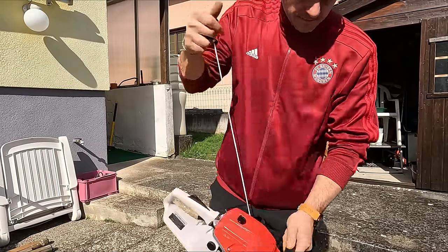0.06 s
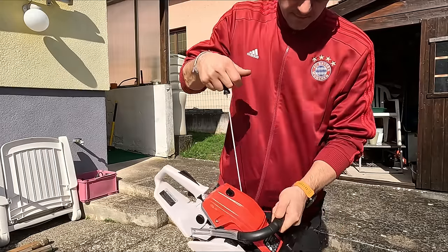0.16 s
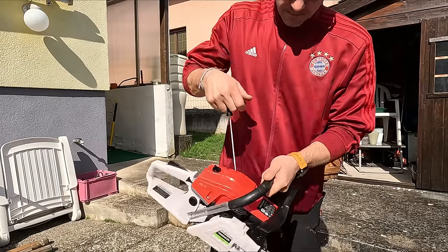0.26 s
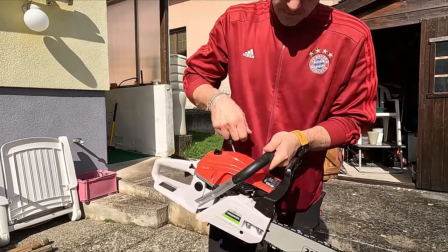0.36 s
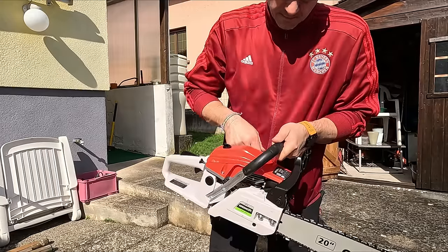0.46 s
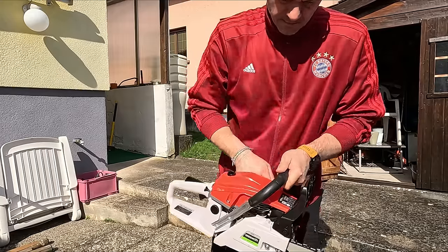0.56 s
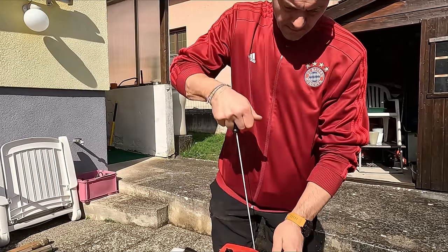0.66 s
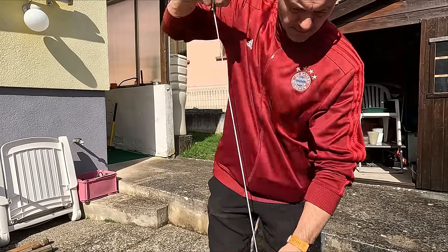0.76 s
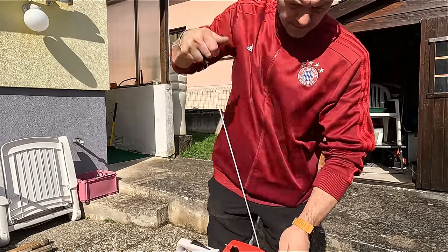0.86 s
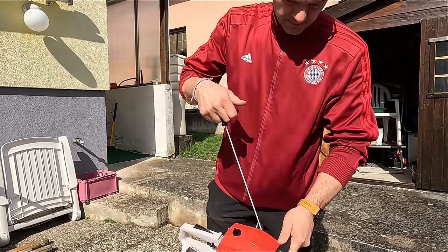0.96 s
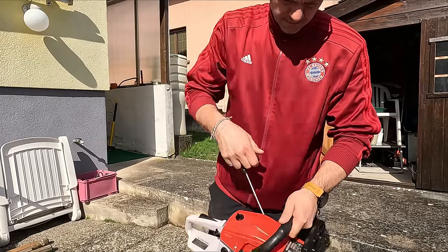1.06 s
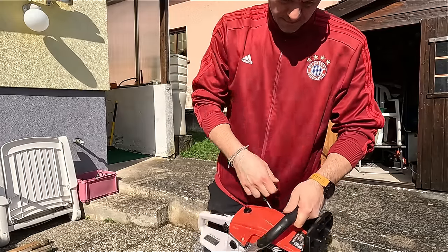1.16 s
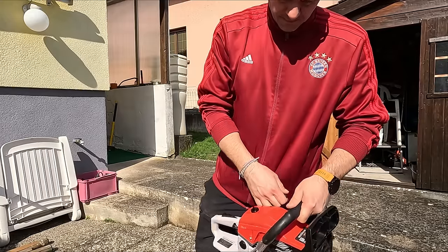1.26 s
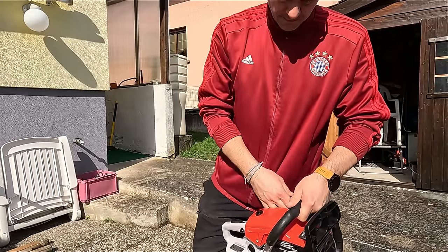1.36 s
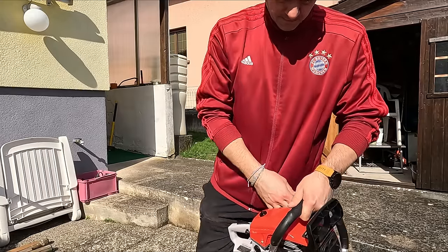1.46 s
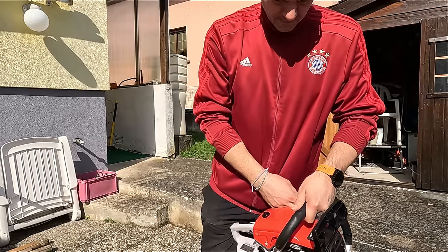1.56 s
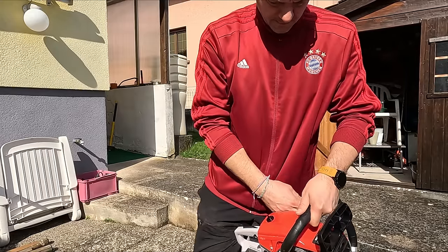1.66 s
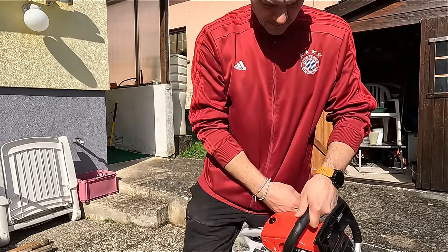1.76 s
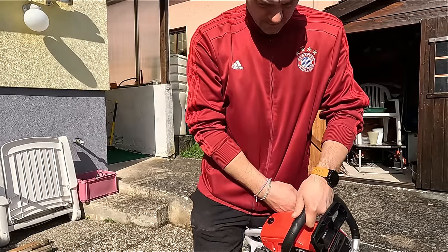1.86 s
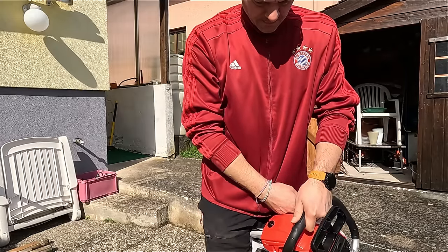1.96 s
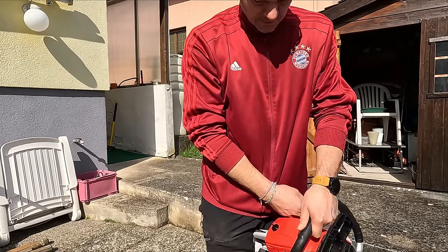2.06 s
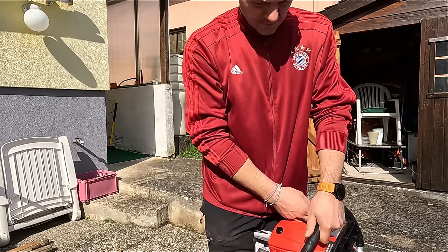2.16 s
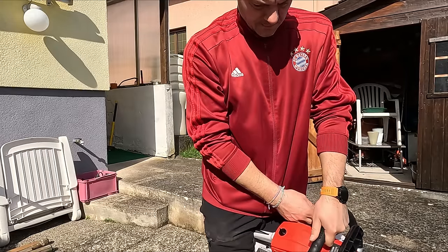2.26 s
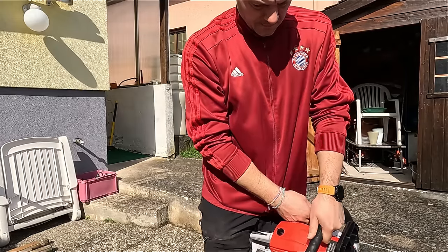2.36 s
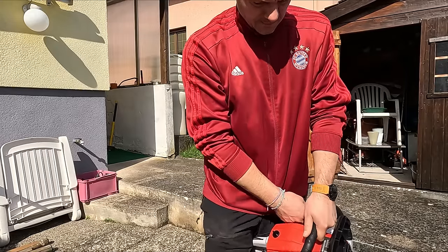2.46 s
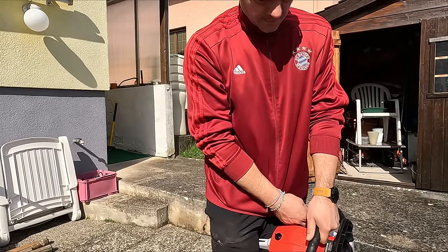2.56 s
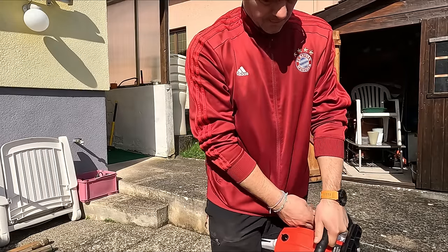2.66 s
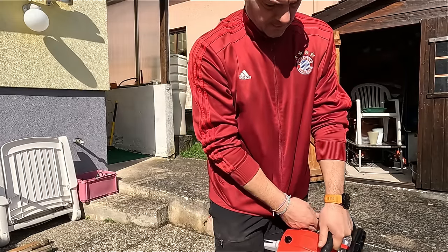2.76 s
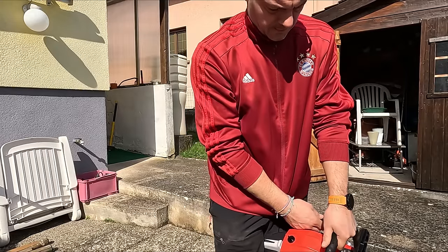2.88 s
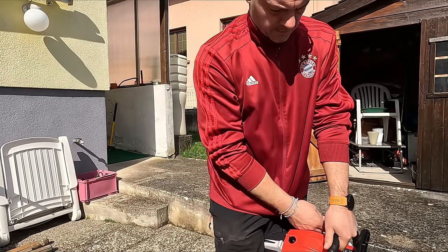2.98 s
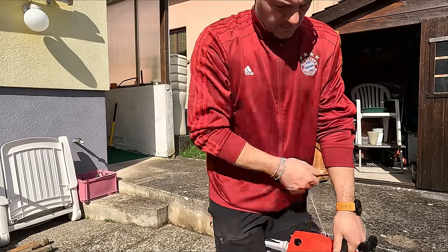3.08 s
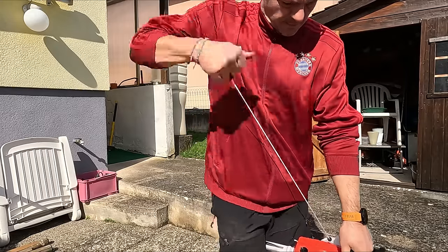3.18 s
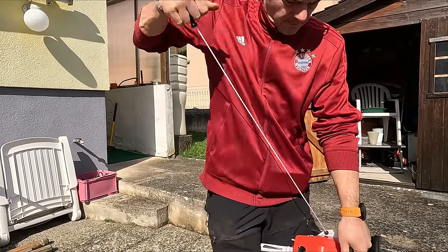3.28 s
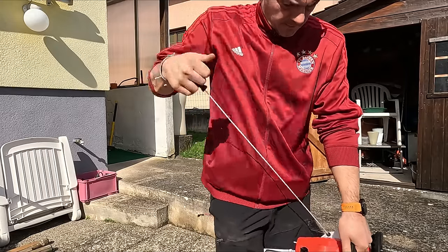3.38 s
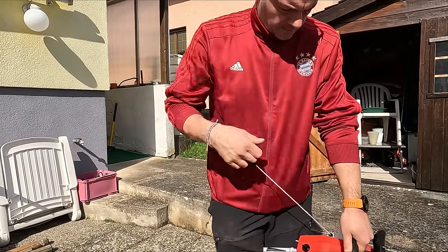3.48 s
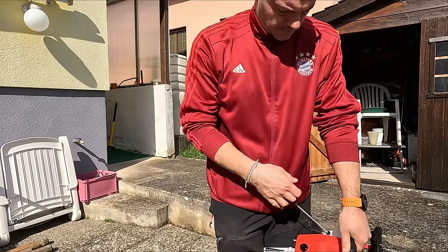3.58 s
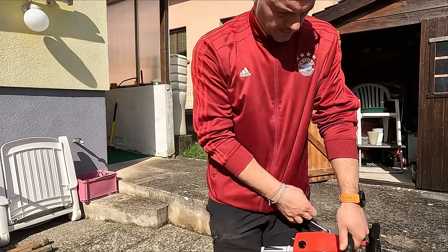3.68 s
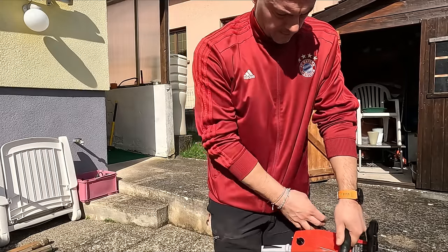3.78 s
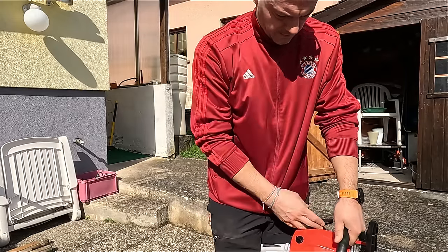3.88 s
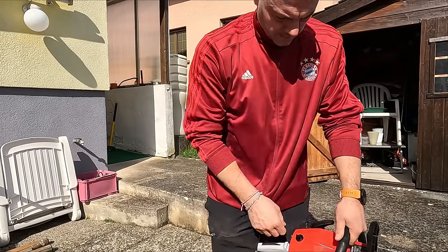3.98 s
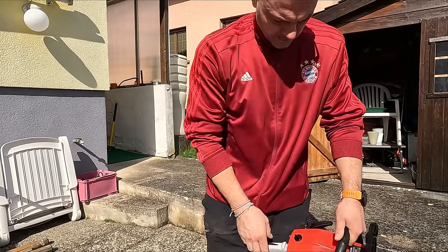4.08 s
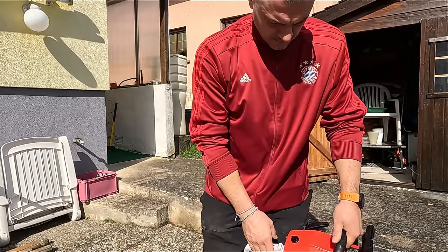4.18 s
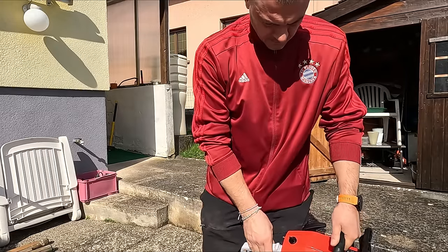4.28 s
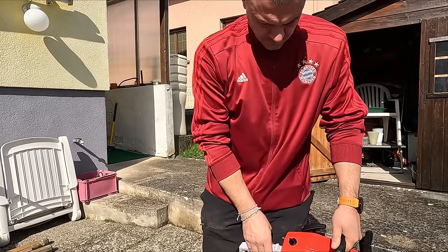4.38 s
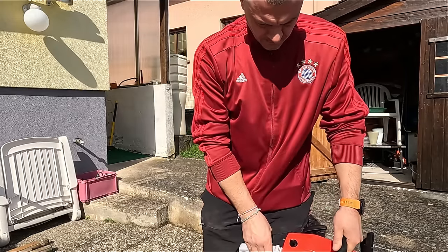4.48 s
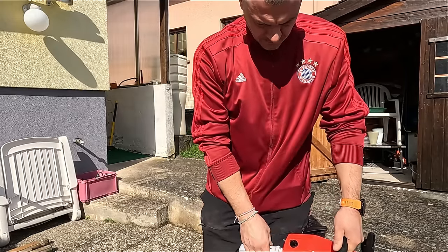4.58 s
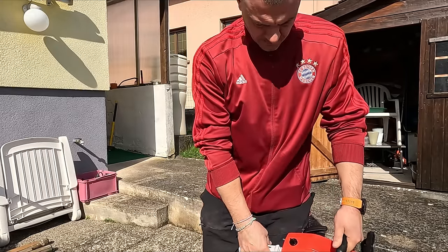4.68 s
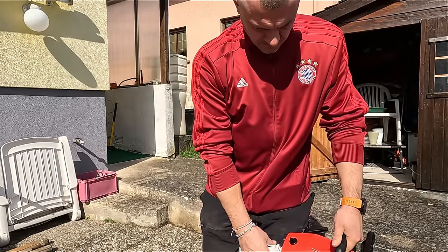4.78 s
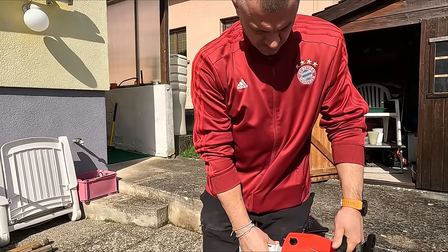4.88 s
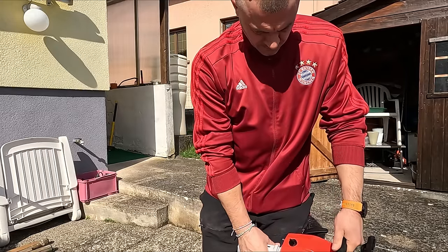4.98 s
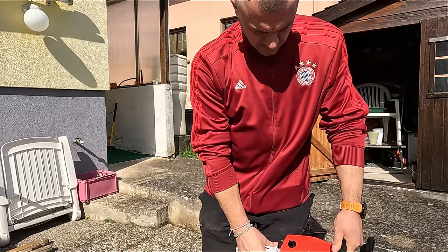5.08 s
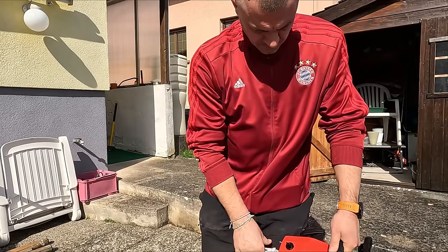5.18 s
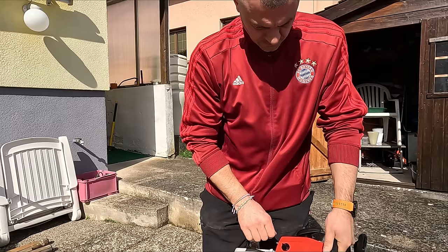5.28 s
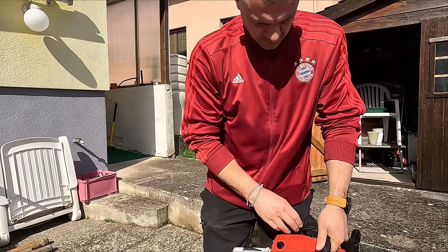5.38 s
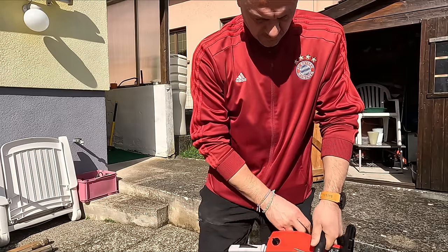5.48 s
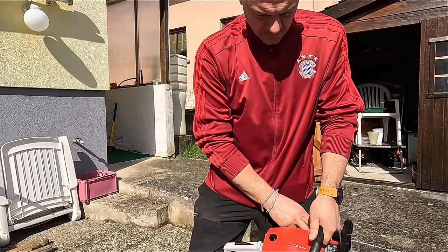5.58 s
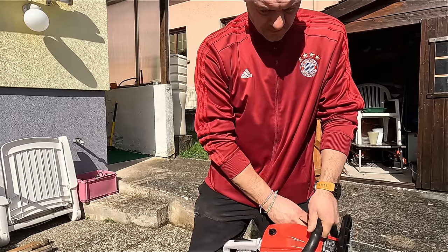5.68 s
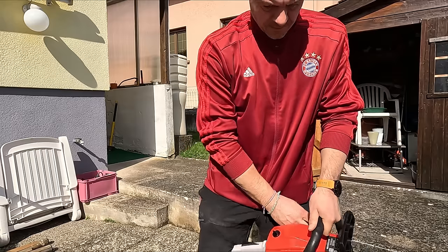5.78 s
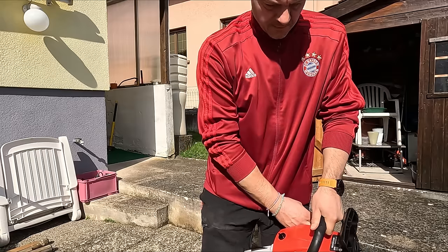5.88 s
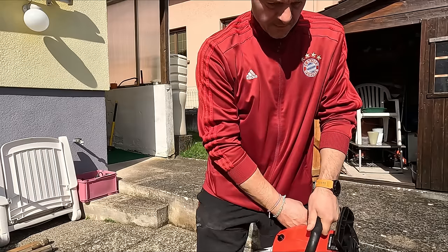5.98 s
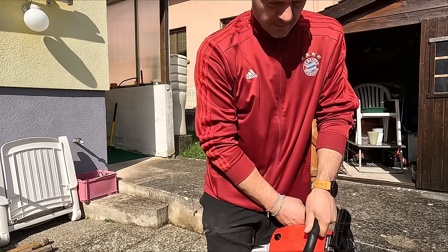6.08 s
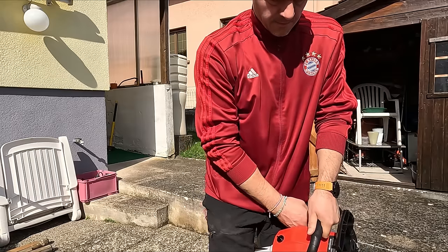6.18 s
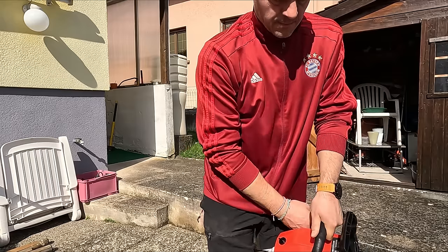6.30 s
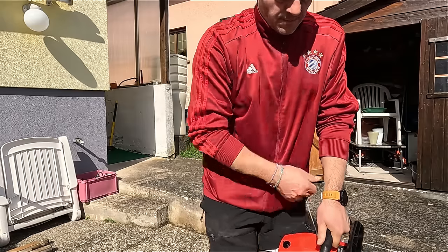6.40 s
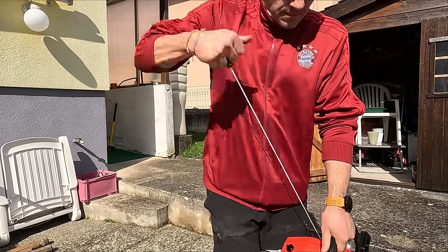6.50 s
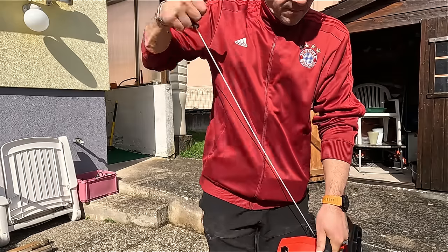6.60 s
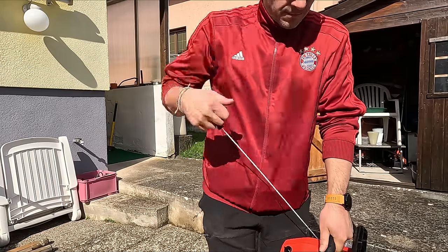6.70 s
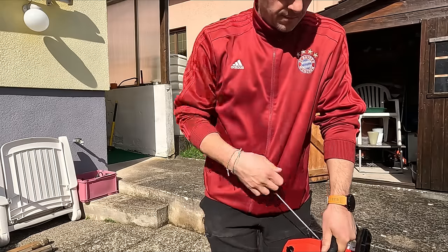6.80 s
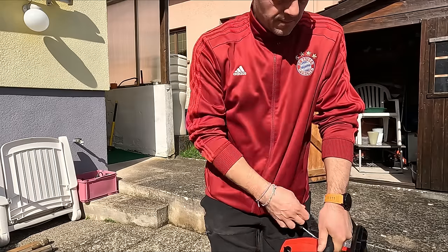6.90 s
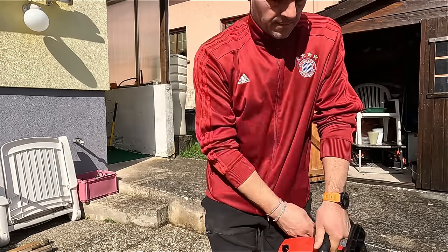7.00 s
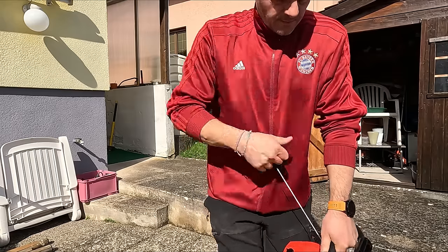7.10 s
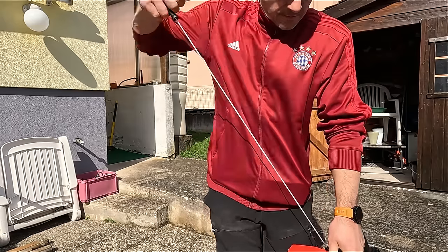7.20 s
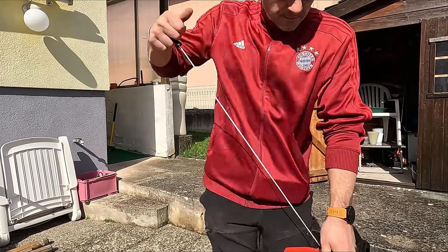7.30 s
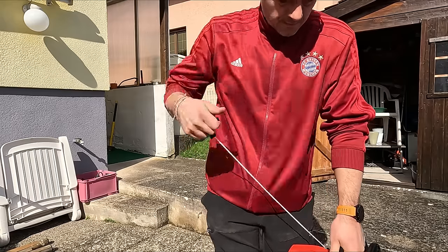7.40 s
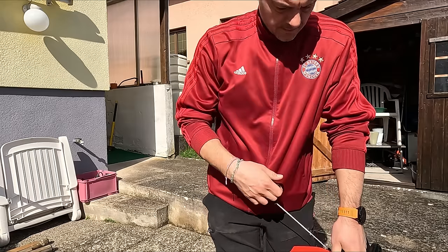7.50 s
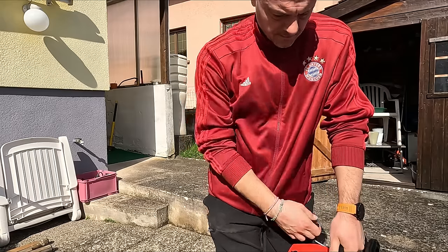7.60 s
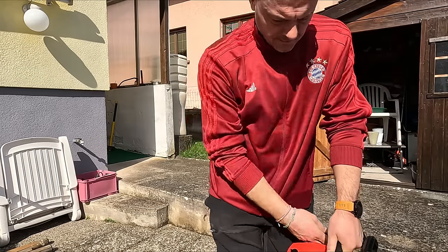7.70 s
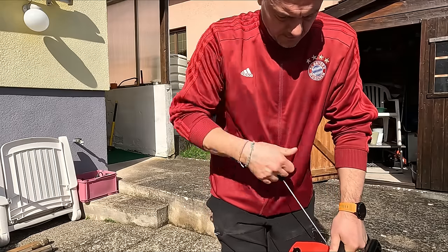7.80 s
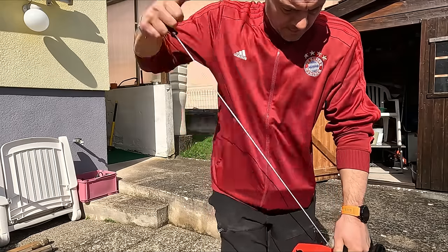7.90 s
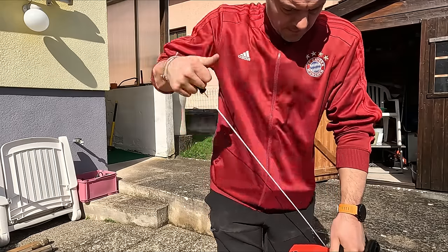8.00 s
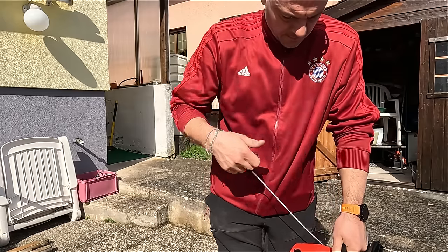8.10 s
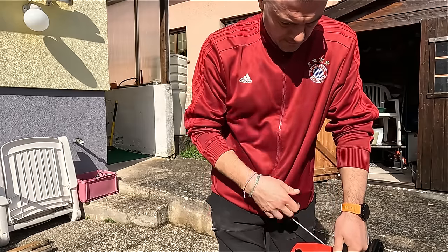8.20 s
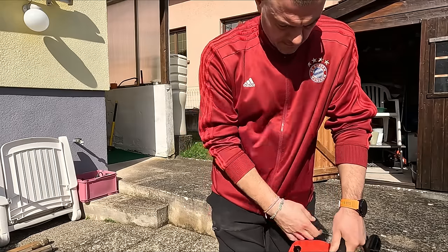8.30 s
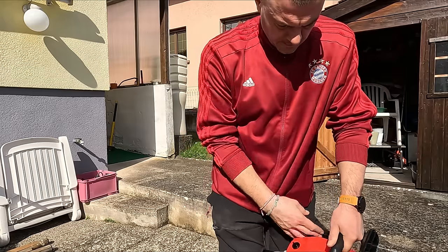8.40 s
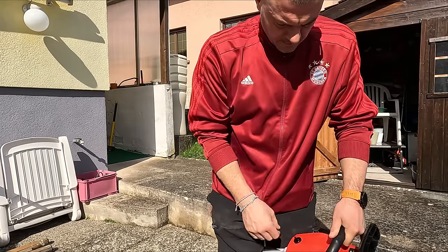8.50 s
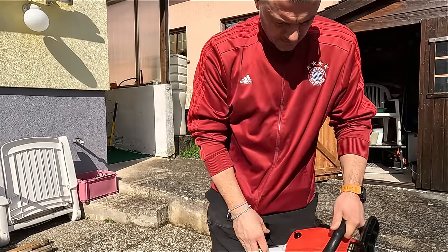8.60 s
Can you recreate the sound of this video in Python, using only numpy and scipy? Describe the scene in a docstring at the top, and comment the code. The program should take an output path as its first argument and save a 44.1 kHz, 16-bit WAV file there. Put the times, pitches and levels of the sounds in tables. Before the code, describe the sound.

A small chainsaw is yanked by its starter cord again and again outdoors, sputtering once, clicking and rewinding, until the last pull makes it fire.

```python
"""A small two-stroke chainsaw is pull-started in a yard: two yanks, each turning the crank a few times before
the cord rewinds and the starter pawls tick; a third yank nearly catches. A lever is flicked, three more yanks
follow and the last starts it. Puffs, cracks and contacts are pulses and noise bursts through muffler, housing and
steel resonances. Shaped noise makes the wind, sleeve rustle and far traffic around them; a bird trills midway."""
import sys
import numpy as np
from scipy import signal
from scipy.fft import rfft, irfft, next_fast_len
from scipy.io import wavfile
from scipy.ndimage import uniform_filter1d, map_coordinates

SR = 44100
rng = np.random.default_rng(int(sys.argv[2]) if len(sys.argv) > 2 else 0)


def wav_out(sig):
    """Save sig, one row per channel (or a flat mono array), as 16-bit PCM at SR to the path in sys.argv[1]."""
    wavfile.write(sys.argv[1], SR, np.round(np.clip(np.atleast_2d(sig).T, -1, 1) * 32767).astype(np.int16))


N = 381465
TIME = np.arange(N) / SR

# Levels in dB are relative, ahead of each source's own gain.
# charge ignites: start_s, crack_db, crank_speed_after_hz
FIRINGS = [(3.3495, -4.5, 31), (3.3829, -2.5, 54), (3.401, -8.5, 54), (3.4327, -57.5, 55),
           (3.4694, -48, 59), (3.5068, -35, 45.66), (8.101, 0, 50), (8.227, -3.5, 48), (8.3226, -2.5, 50),
           (8.3864, -14.5, 45), (8.4082, -23, 41), (8.4346, -18, 41), (8.458, -9.5, 43), (8.5051, -4, 47.4),
           (8.571, -6.5, 51), (8.6317, -13, 47)]
# yanks of the cord: first_full_puff_s, slow_turn_before_s, time_stretch_ratio, strength_db, whirr_after_db, whirr_end_s
YANKS = [(0.0508, .06, .86, 0, -31, .58), (0.8127, .030, .9, 0, -30, 1.31),
         (3.2879, .038, 1.01, -1, -36, 3.71), (6.5998, .034, 1.005, .3, -29, 7.08),
         (7.2748, .033, 1.001, 0, -29, 7.77), (7.9732, .045, 1.002, 0, -41, 8.7)]
# crank turns of a yank, quickening then running down: after_first_puff_s, exhaust_puff_db, intake_gulp_re_puff_db
CRANK_TURNS = [(0, 0, -2.5), (0.0308, -1, -3.5), (0.057, -4.5, 5), (0.093, -3, 3.5), (0.143, -8, 9),
               (.202, -10, 8)]
# whirr of cord, pulley and flywheel: from_first_puff_s, whirr_db, air_rush_re_whirr_db
WHIRR = [(-.11, -38.5, -19.5), (-.075, -36.5, 6), (-.01, -26.5, 5), (0.149, -27.5, 2)]
# pawls catch, clank and fly off the steel cup, the handle drops home: start_s, tick_db, ring_re_tick_db
PAWLS = [(0.032, -32, -25), (0.0868, -11.5, 3), (0.1584, -14.5, -2), (0.1844, -9.5, 6),
         (0.6562, -12.5, -6.5), (0.7173, -13.5, -10), (0.7554, -10.5, -26), (0.86, -8, -5.5),
         (0.9323, -9, 4.5), (0.969, -7, -3), (3.1965, -3.5, -21), (3.6112, -14, 3), (3.759, -23, 1),
         (3.8177, -25, -1), (3.937, -9, -20), (6.5034, -11.5, -14.5), (6.568, -7.5, -26),
         (6.6473, -5.5, -8), (6.7281, -9, -13.5), (6.7536, -14, 6), (7.1875, -8, -6.5), (7.3333, -6.5, -3),
         (7.417, -7.5, -10), (7.4396, -9, -22), (7.8272, -19.5, -16)]
# ratchet of the rewinding pulley: start_s, tick_db
RATCHET = [(0.3102, -17), (0.342, -16.5), (0.391, -17), (0.4322, -13), (0.482, -23), (0.5392, -17),
           (1.0743, -8), (1.094, -17.5), (1.1192, -20), (1.1447, -13), (1.1787, -14), (1.216, -17.5),
           (1.27, -17), (1.3467, -34), (1.3598, -14.5), (6.8669, -10), (6.9025, -12.5), (6.946, -14),
           (6.975, -24), (7.017, -21), (7.0607, -28.5), (7.5494, -13), (7.622, -9.5), (7.6717, -23),
           (7.7448, -20)]
# fingers on lever and casing: start_s, snap_db, t60_s, knock_re_snap_db
FINGERS = [(2.537, -27.5, 0.17, -6), (2.6253, -34.5, 0.12, -8), (5.0536, -6, 0.08, -12),
           (5.194, -23.5, 0.067, -12), (5.271, -16.5, 0.022, 6), (5.536, -36.5, 0.028, 20),
           (5.6985, -25, 0.025, -19), (6.2193, -28, 0.044, -6)]
# sleeve rustles: middle_s, half_length_s, level_db
RUSTLES = [(1.5, 0.17, -54.5), (1.92, 0.24, -52), (2.35, 0.14, -59.5), (2.67, 0.24, -49.5),
           (3.15, 0.057, -43.5), (4.717, 0.19, -56.5), (4.973, 0.026, -49.5), (5.233, .15, -49.5),
           (5.6, 0.17, -49), (6.08, 0.23, -50), (6.382, 0.023, -49.5)]
# wind on the microphone: time_s, level_db
WIND = [(0, -39), (.6, -50.5), (1.1, -32.5), (1.4, -50), (1.9, -43), (2.03, -39), (2.3, -42.5),
        (2.7, -44.5), (3.02, -39), (3.8, -47), (4.07, -32), (4.2, -42), (4.32, -28), (4.45, -29),
        (4.55, -43), (4.7, -36), (4.9, -45), (6.6, -47.5), (7.9, -64), (8.3, -40), (8.65, -36)]
# drone of a far engine: time_s, level_db
DRONE = [(0, -53.5), (1.1, -43.5), (1.6, -53), (5.6, -51), (6.2, -39.5), (8.65, -59.5)]
# muffler modes, cold gas: centre_hz, width_hz, level_db
MUFFLER = [(72.7, 13, -8.5), (122, 20.6, -10.5), (173, 38, -14), (250.6, 33.7, -1), (341, 45, -9),
           (537, 152, -8), (900, 230, -17)]
# sign of each muffler mode, low ones against upper ones: sign
MUFFLER_SIGNS = [-1, -1, -1, 1, 1, 1, 1]
# steel starter modes: centre_hz, width_hz, level_db
STEEL = [(3390, 30, -8), (3620, 24, 2), (3839, 28, -3), (4247, 45, -1), (4335, 36, 4), (4671, 25, -9),
         (5190, 45, -5), (7000, 150, -11), (7880, 22, -6), (8740, 40, -16), (9040, 40, -14),
         (10250, 25, -19), (10700, 120, -19)]
# plastic housing modes: centre_hz, width_hz, level_db
HOUSING = [(571.4, 22.4, 10), (738, 140, 0.5), (1080, 175, 3.5), (1850, 360, -1), (2700, 390, -6.5),
           (3040, 1300, -3)]
# fanned air spectrum: freq_hz, density_db
AIR = [(900, -3), (1900, 3.5), (2600, 3.5), (3300, -1.5), (4100, -5.5), (5200, -11), (8200, -16),
       (15500, -82.5)]
# ignition crack spectrum: freq_hz, density_db
CRACK = [(410, 0.5), (700, -10.5), (2160, -10.5), (3970, -10.5), (5640, -19), (8540, -16), (9600, -29.5),
         (15500, -61)]
# plastic snap spectrum: freq_hz, density_db
SNAP = [(350, -11), (600, -9.5), (1700, 3), (3100, 2), (6500, -10), (15500, -31)]
# wind spectrum: freq_hz, density_db
GUST = [(8.8, -20), (15, -2), (43, 2.5), (108, -7.5), (450, -32.5), (580, -56), (990, -120)]
# traffic spectrum: freq_hz, density_db
TRAFFIC = [(88, -33), (150, -3.5), (372, -9), (643, 1), (1410, 1), (2250, -8), (7980, -23.5), (9000, -21.5),
           (11700, -99), (19800, -120)]
# sleeve cloth spectrum: freq_hz, density_db
CLOTH = [(710, 3.5), (1200, 5), (1610, -1), (3210, -2), (7550, -9.5), (15000, -39)]
# saw level between the ports: freq_hz, left_minus_right_db
PORT_LEVEL = [(100, -.4), (400, -1.5), (1500, -2.7), (6000, -1.5), (14000, 2)]
# saw phase lag of the left port: freq_hz, lag_rad
PORT_LAG = [(150, 0), (3200, .7), (8000, 0)]
# decay of wall reflections: freq_hz, t60_s
WALLS = [(200, 0.15), (2000, 0.15), (12000, 0.21)]
# microphone treble: freq_hz, gain_db
MICROPHONE = [(10500, 0), (12500, -7), (15500, -11.5)]

TOP_HZ = 15700
SLOW_TURN_DB, SLOW_GULP_DB = -12, 5.5
FIRED_DB, FIRED_GULP_DB = -6, -12
DRAG_HZ2 = 457  # squared speed lost in each idle turn
# unburnt puffs recover turn by turn and fade under KNEE_HZ; gulps weaken above it
KNEE_HZ = 33
IDLE_DB, IDLE_GAIN_DB, IDLE_TOP_DB, STALL_DB_PER_HZ = -12.5, 2.5, 0.5, 0.58
GULP_DB, GULP_DB_PER_HZ, SCATTER_DB = 1.5, -0.16, 1.77
BLOW_WIDTH_S, FIRED_BLOW_WIDTH_S, CRACK_LEAD_S = 0.00055, 0.00035, 0.0022
HOT_UPPER_DB = 5  # hot gas drives the modes above 400 Hz harder
LET_GO_S, SAG_DB_PER_S, STOP_S = 0.066, -17.5, 0.067
REWIND_AIR_DB, RUNNING_AIR_DB = -5, 8  # re whirr
RATCHET_RING_DB = -19.5
TRILL_START_S, TRILL_GAP_S, TRILL_TOP_HZ, TRILL_DB = 4.635, 0.0225, 8200, -56


def engine():
    """Muffler modes ring to each puff; gas adds flutter, ignition adds cracks."""
    start_s, puff_db, gulp_db = crank()
    return puffs(start_s, puff_db, gulp_db) + flutter(start_s, puff_db) + cracks()


def crank():
    """Every crank turn as (s, puff dB, gulp dB): pulled by the cord, then kicked by firings and slowed by drag."""
    fired = np.array([s for s, _, _ in FIRINGS] + [np.inf])
    turns = [(s, FIRED_DB, FIRED_GULP_DB) for s in fired[:-1]]
    for start, before, stretch, db, _, _ in YANKS:
        catch = fired[fired > start][0] - 0.01
        for after, puff_db, gulp_db in CRANK_TURNS:
            when = start + stretch * after
            if when < catch:
                turns.append((when, db + puff_db, gulp_db))
        if start > before:
            turns.append((start - before, db + SLOW_TURN_DB, SLOW_GULP_DB))
    for (s, _, hz), following in zip(FIRINGS, fired[1:]):
        turns += idle_turns(s, hz, following)
    s, db, gulp_db = np.transpose(sorted(turns))
    chance_db = SCATTER_DB * rng.standard_normal((100, 2))[:len(s)]
    return s, db + chance_db[:, 0], gulp_db + 2 * chance_db[:, 1]


def idle_turns(fired_s, hz, following_s):
    """Unburnt turns after a firing: drag takes equal steps off the squared speed until the next firing."""
    k = np.arange(min(8, int(hz ** 2 / DRAG_HZ2) + 1))
    speed_hz = np.sqrt(hz ** 2 - DRAG_HZ2 * k)
    when = fired_s + np.cumsum(1 / speed_hz)
    puff_db = np.minimum(IDLE_DB + IDLE_GAIN_DB * (k + 1), IDLE_TOP_DB)
    puff_db = puff_db - STALL_DB_PER_HZ * np.clip(KNEE_HZ - speed_hz, 0, 10)
    gulp_db = GULP_DB + GULP_DB_PER_HZ * np.clip(speed_hz - KNEE_HZ, 0, None)
    latest = np.minimum(following_s - 0.5 / speed_hz, N / SR - 0.005)
    return [row for row, limit in zip(zip(when, puff_db, gulp_db), latest) if row[0] < limit]


def puffs(start_s, puff_db, gulp_db):
    """The port opens on a brief suction, then blows; the intake gulps about a third of a turn later."""
    turn_s = np.clip(np.diff(start_s, append=start_s[-1]), 0.022, 0.034)
    heat = np.clip((0.03 - turn_s) / 0.008, 0, 1)  # a fast crank means hot gas
    cold_port, hot_port = np.zeros(N), np.zeros(N)
    fired = [s for s, _, _ in FIRINGS]
    for k, s in enumerate(start_s):
        width_s = FIRED_BLOW_WIDTH_S if s in fired else BLOW_WIDTH_S
        suction = push(s - 0.0023, puff_db[k] - 5.5, 0.00078)
        blow = push(s - 0.0006, puff_db[k] + 2, width_s)
        gulp = push(s + 0.2908 * turn_s[k], puff_db[k] + gulp_db[k] - 3, 0.00077)
        pressure = blow - suction + gulp
        cold_port += (1 - heat[k]) * pressure
        hot_port += heat[k] * pressure
    # sound is faster in hot gas
    hot_modes = [(1.1 * hz, 1.8 * w, db + HOT_UPPER_DB * (hz > 400)) for hz, w, db in MUFFLER]
    cold = filtered(cold_port, ringing(MUFFLER, MUFFLER_SIGNS))
    hot = filtered(hot_port, ringing(hot_modes, MUFFLER_SIGNS))
    return amp(10.5) * (cold + hot)


def flutter(start_s, puff_db):
    """Turbulent gas: each puff breathes noise through the upper muffler modes."""
    breath = bursts([(s - 0.002, db, 0.09) for s, db in zip(start_s, puff_db)], 0.00058)
    return amp(-19) * breath * unit(filtered(rng.standard_normal(N), ringing(MUFFLER[4:])))


def cracks():
    """Ignition: a short gritty burst with a weaker, longer tail."""
    short = bursts([(s - CRACK_LEAD_S, db + 1, 0.014) for s, db, _ in FIRINGS], 0.00083)
    tail = bursts([(s - CRACK_LEAD_S, db - 14, 0.05) for s, db, _ in FIRINGS], 0.00081)
    return coloured((short + tail) * grit(1.5), CRACK)


def starter():
    """Whirr of the spinning parts plus pawl and ratchet strikes."""
    return whirr() + strikes()


def whirr():
    """The spinning parts rattle the housing, fan the air and jingle the steel."""
    rattle = patchy(filtered(grit(2), ringing(HOUSING)), 4)
    air = patchy(coloured(grit(1.5), AIR), 4)
    jingle = unit(filtered(grit(3), ringing(STEEL)))
    out = np.zeros(N)
    for start, _, stretch, db, after_db, end in YANKS:
        whirr_db, air_db = curves(spin(start, stretch, db, after_db, end))
        out += amp(whirr_db + 2 * wobble(70)) * (rattle + amp(-7 + 4 * wobble(25)) * jingle)
        out += amp(whirr_db + air_db + 2 * wobble(90)) * air
    return out


def spin(start, stretch, db, after_db, end):
    """Whirr and air of one yank: a swell under the pull, then a sagging rewind or the quieter running flywheel."""
    rows = [(start + stretch * s, db + whirr_db, air_db) for s, whirr_db, air_db in WHIRR]
    caught = [s for s, _, _ in FIRINGS if start < s < rows[-1][0]]
    if caught:
        rows[-1] = (caught[-1] - LET_GO_S / 2, *rows[-1][1:])
    free = rows[-1][0] + LET_GO_S
    air_db, sag_db = (RUNNING_AIR_DB, 0) if caught else (REWIND_AIR_DB, SAG_DB_PER_S * (end - free))
    end_db = after_db + sag_db
    return rows + [(free, after_db, air_db), (end, end_db, air_db), (end + STOP_S, end_db - 18, REWIND_AIR_DB)]


def strikes():
    """Each pawl or ratchet strike ticks air and housing noise and rings the steel modes."""
    ratchet = [(s, db, RATCHET_RING_DB - db + rng.normal(0, 0.5)) for s, db in RATCHET]
    rows = PAWLS + ratchet
    tick_level = bursts([(s, db, 0.04) for s, db, _ in rows], 0.0013)
    hiss = patchy(coloured(grit(1.8), AIR), 4)
    rattle = patchy(filtered(grit(2.8), ringing(HOUSING)), 4)
    ticks = amp(-7) * tick_level * (hiss + rattle)
    # the pawl bounces on the cup
    chatter = bursts([(s, db + ring_db, 0.04) for s, db, ring_db in rows], 0.002) * patchy(grit(1), 3)
    return ticks + amp(20.5) * filtered(chatter, ringing(STEEL))


def fingers():
    """Dry plastic snaps, a cluster of small contacts, and the hollow knock of the housing."""
    snap_level = bursts([(s, db, t60) for s, db, t60, _ in FINGERS], 0.0013)
    snaps = snap_level * patchy(coloured(grit(3.26), SNAP), 1.1)
    knock_level = bursts([(s, db + knock_db, t60) for s, db, t60, knock_db in FINGERS], 0.0014)
    knocks = knock_level * unit(filtered(grit(5.7), ringing(HOUSING[:3])))
    return amp(-5.5) * (snaps + knocks)


def walls(x):
    """House walls and paving scatter the upper range; each frequency dies at its own speed."""
    hz, t, z = signal.stft(rng.standard_normal((2, SR // 3)), SR, nperseg=256)
    tail = signal.istft(z * amp(-60 * t / along(WALLS, hz)[:, None]), SR, nperseg=256)[1]
    upper = filtered(x, lambda f: 1j * f / (800 + 1j * f))
    delayed = np.pad(upper, (150, 0))[None]
    return signal.fftconvolve(delayed, tail / np.linalg.norm(tail[0]), axes=1)[:, :N]


def yard():
    """Wind, sleeve, far traffic with a low drone, and a bird."""
    return wind() + sleeve() + drone() + traffic() + bird()


def wind():
    """Lumpy low noise on the ports; strong gusts also slap them higher up."""
    wind_db = curves(WIND)[0] + 2.5 * wobble(14)
    rumble = amp(wind_db + 3.5) * spread(unit(coloured(rng.standard_normal((2, N)), GUST)), 0.89)
    mode = ringing([(150, 200, 0)])
    slap_noise = unit(filtered(rng.standard_normal((2, N)), lambda f: mode(f) ** 2))
    slap = amp(2 * wind_db + 18) * spread(slap_noise, 0.94)
    return (rumble + slap) * amp([[-1.2], [1.2]])


def sleeve():
    """Cloth rubs as grainy noise in smooth swells."""
    moving = sum(amp(db) * np.exp(-((TIME - s) / half) ** 4) for s, half, db in RUSTLES)
    cloth = unit(coloured(np.array([grit(2.5), grit(2.5)]), CLOTH))
    return moving * amp(3 + 2 * wobble(30)) * spread(cloth, 0.75)


def drone():
    """A far engine: noise through one narrow low resonance."""
    return amp(curves(DRONE)[0]) * unit(filtered(rng.standard_normal(N), ringing([(66.6, 8.0, 0)])))


def traffic():
    """Far traffic: wide, wavering shaped noise."""
    hum = spread(unit(coloured(rng.standard_normal((2, N)), TRAFFIC)), 0.6)
    return amp(-49 + 1.5 * wobble(20)) * hum


def bird():
    """Far high trill of nine short falling notes."""
    out, t = np.zeros(N), TIME[:SR // 80]
    note = np.hanning(len(t)) * np.sin(2 * np.pi * TRILL_TOP_HZ * (t - 9 * t ** 2))
    for k in range(9):
        start = round((TRILL_START_S + k * TRILL_GAP_S) * SR)
        out[start:][:len(t)] += amp(TRILL_DB + rng.normal(0, 2)) * note
    return out


def amp(db):
    """Decibels to gain."""
    return 10 ** (np.asarray(db) / 20)


def unit(x):
    """Scaled to rms 1."""
    return x / np.sqrt(np.mean(x ** 2) + 1e-20)


def along(points, hz):
    """(Hz, value) points read on a log axis."""
    f, v = np.transpose(points)
    return np.interp(np.log(hz + 1), np.log(f + 1), v)


def curves(rows):
    """One value per sample for each column; -200 outside the rows."""
    s, *cols = np.transpose(rows)
    return [np.interp(TIME, s, c, left=-200, right=-200) for c in cols]


def wobble(rate_hz):
    """A smooth random curve, rate_hz knots a second."""
    return map_coordinates(rng.standard_normal(int(N * rate_hz / SR) + 4), [TIME * rate_hz])


def filtered(x, response):
    """x through a complex response of frequency."""
    m = next_fast_len(N + SR // 2)
    return irfft(rfft(x, m) * response(np.fft.rfftfreq(m, 1 / SR)), m)[..., :N]


def ringing(modes, signs=None):
    """Causal response of a set of resonances, of alternating sign unless given."""
    signs = signs or [(-1) ** k for k in range(len(modes))]

    def response(f):
        return sum(sign * amp(db) * 1j * f * width / (centre ** 2 - f * f + 1j * f * width)
                   for sign, (centre, width, db) in zip(signs, modes))
    return response


def coloured(x, spectrum):
    """x with the given spectrum, energy kept."""
    y = filtered(x, lambda hz: amp(along(spectrum, hz)))
    return y * np.linalg.norm(x) / np.linalg.norm(y)


def grit(spiky_db):
    """Noise whose samples have widely spread sizes: many tiny contacts."""
    return unit(rng.standard_normal(N) * amp(spiky_db * rng.exponential(size=N)))


def patchy(x, depth_db):
    """Small random islands of gain in time and frequency: contacts that each ring their own spot."""
    z = signal.stft(x, nperseg=256)[2]
    field = uniform_filter1d(rng.standard_normal(z.shape), size=3, axis=0)
    field = uniform_filter1d(field, size=3, axis=1)
    return unit(signal.istft(z * amp(depth_db * unit(field)), nperseg=256)[1][:N])


def spread(noise, alike):
    """Two noises mixed to a left-right pair of the given likeness."""
    u = np.arccos(np.clip(alike, 0, 1)) / 2
    return np.cos(u) * noise[0] + np.sin(u) * noise[1] * np.array([[1], [-1]])


def push(s, db, width_s):
    """A smooth pressure bump centred on s."""
    out, middle = np.zeros(N), round(s * SR)
    k = np.arange(middle - 200, min(N, middle + 200))
    out[k] = amp(db) * np.exp(-((k / SR - s) / width_s) ** 2)
    return out


def bursts(rows, rise_s):
    """Summed envelopes of events (s, dB, t60 s)."""
    out, t = np.zeros(N + SR), TIME[:SR // 4]
    for s, db, t60 in rows:
        out[round(s * SR):][:len(t)] += amp(db - 60 * t / t60) * (1 - np.exp(-t / rise_s))
    return out[:N]


def scene():
    """The saw stands slightly right of the two microphone ports."""
    saw = engine() + starter() + fingers()
    side = np.array([[0.5], [-0.5]])

    def ports(hz):
        return amp(side * along(PORT_LEVEL, hz)) * np.exp(-1j * side * along(PORT_LAG, hz))
    return filtered(saw, ports) + amp(-11) * walls(saw) + yard()


def record(dry):
    """Gain control turns down after loud moments; peaks saturate; the top range fades and ends at the band limit."""
    step = 1 / (0.12 * SR)  # 0.12 s averaging
    loud = signal.lfilter([step], [1, step - 1], np.mean(dry ** 2, axis=0))
    ridden = dry * (1 + loud / amp(-19.5) ** 2) ** -0.08
    squeezed = ridden / (1 + np.abs(ridden) ** 6) ** (1 / 6)
    limited = filtered(squeezed, lambda hz: amp(along(MICROPHONE, hz)) * (hz < TOP_HZ))
    return np.clip(0.97 * limited, -1, 1)


dry = scene()
out = record(dry)
wav_out(out)
```